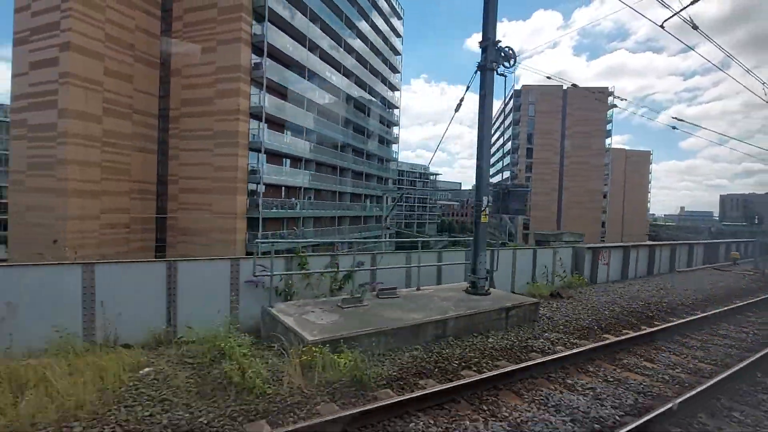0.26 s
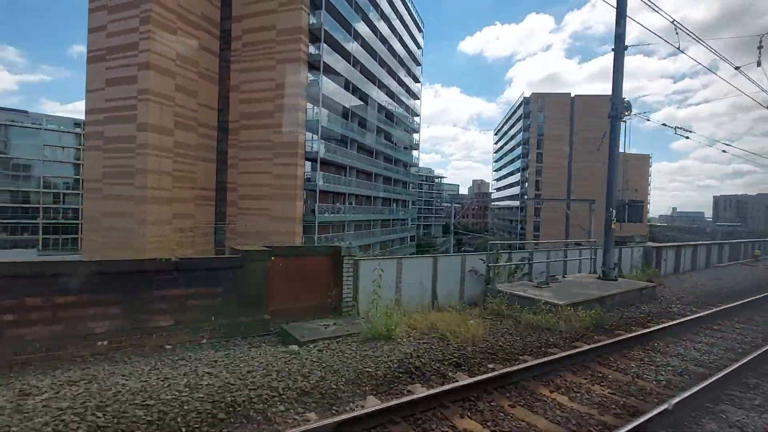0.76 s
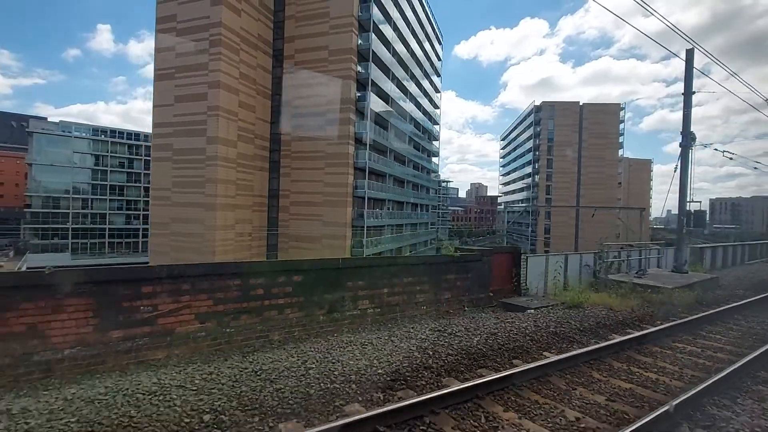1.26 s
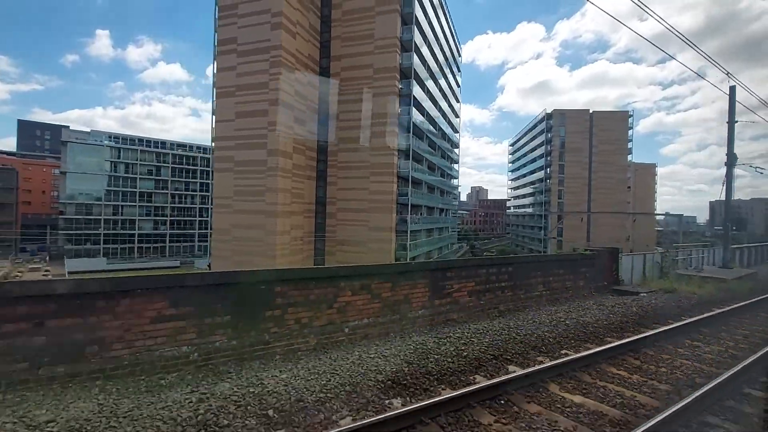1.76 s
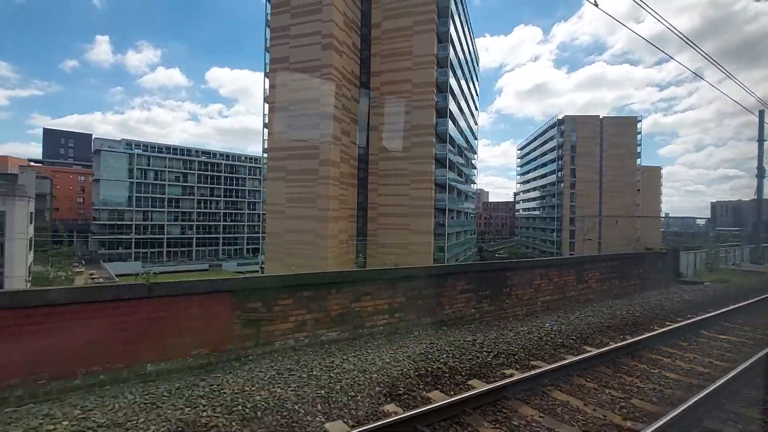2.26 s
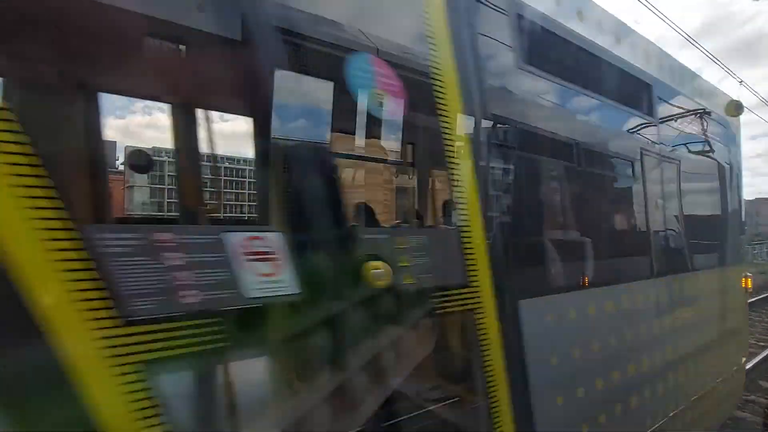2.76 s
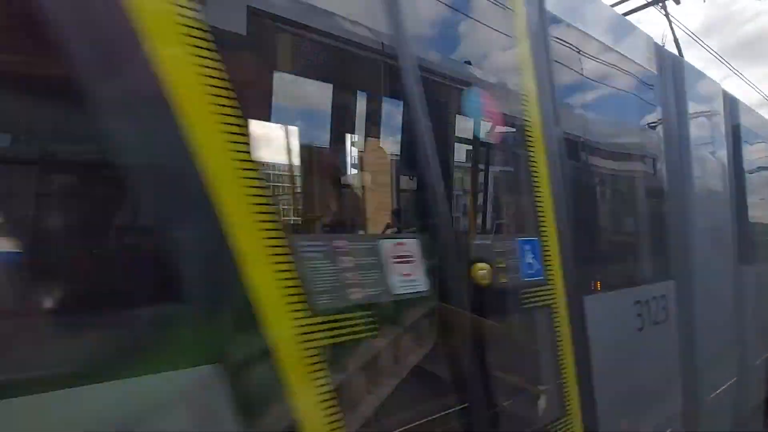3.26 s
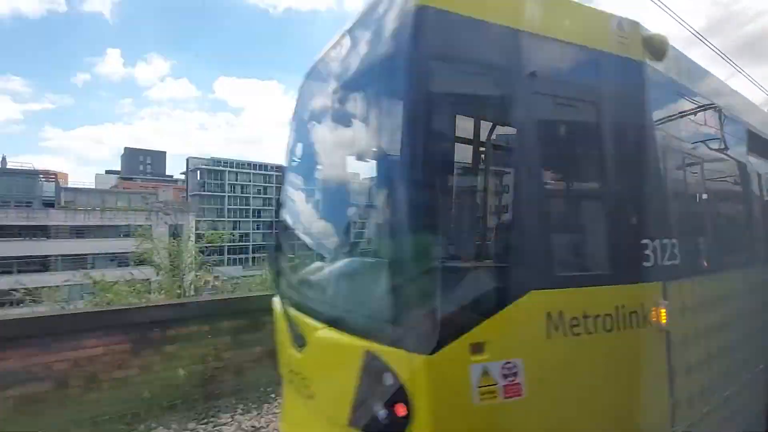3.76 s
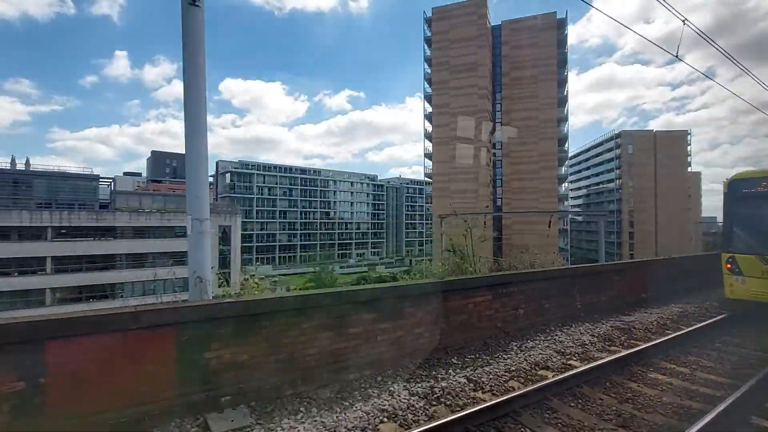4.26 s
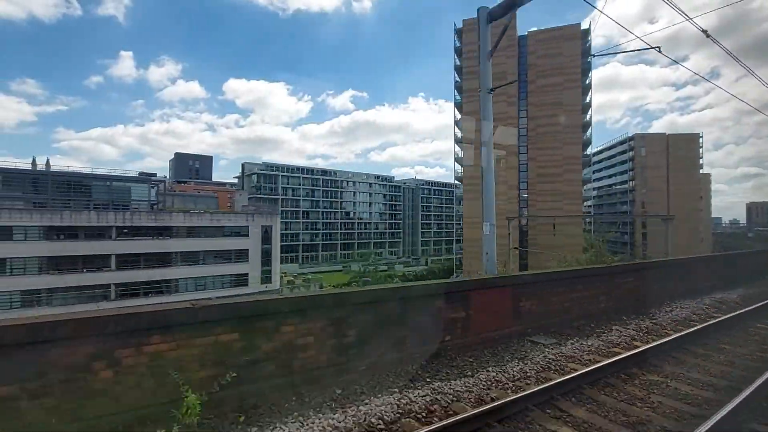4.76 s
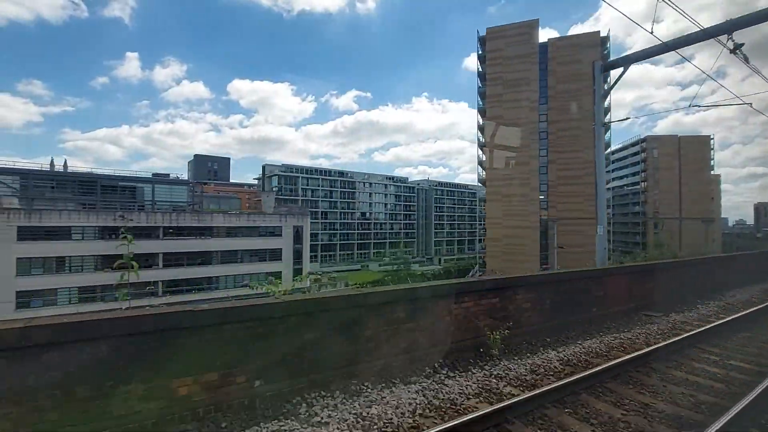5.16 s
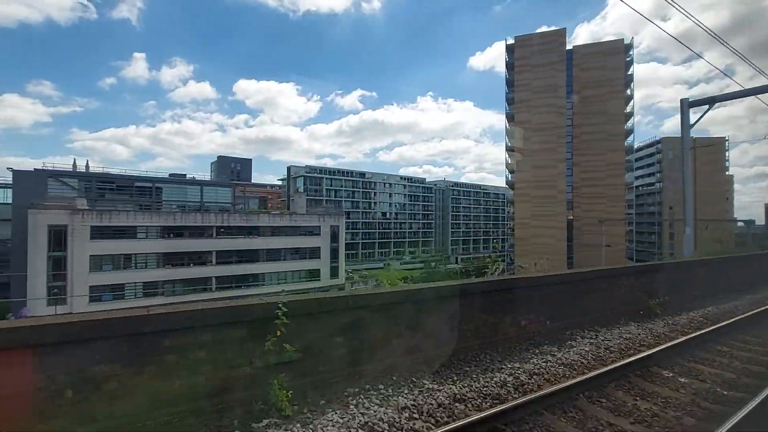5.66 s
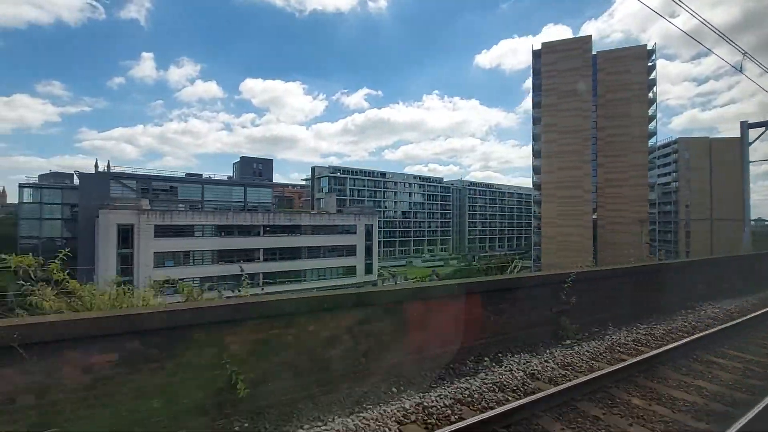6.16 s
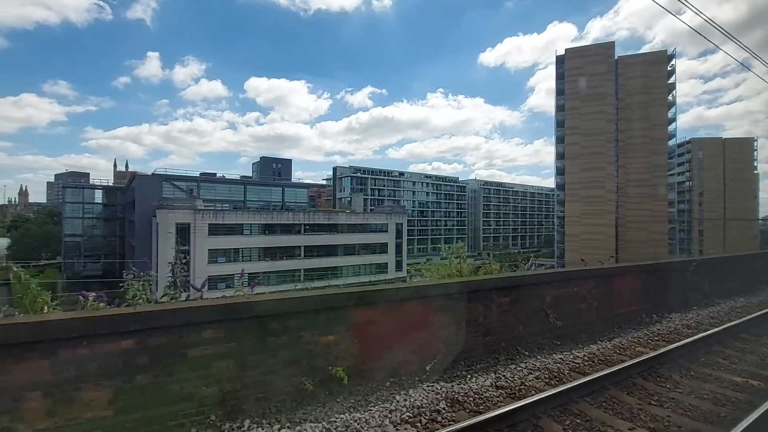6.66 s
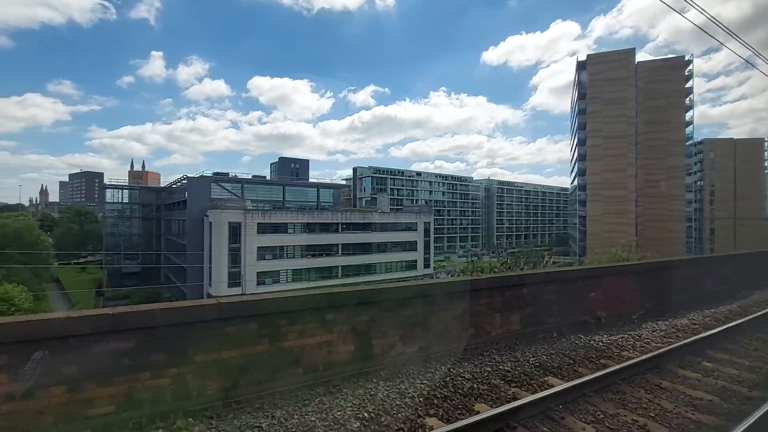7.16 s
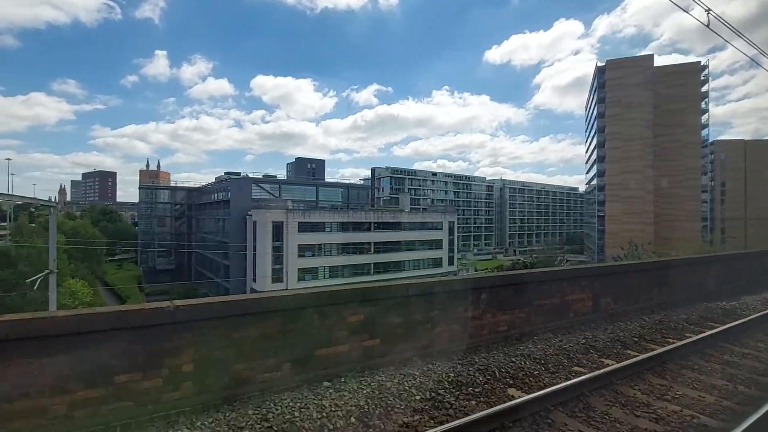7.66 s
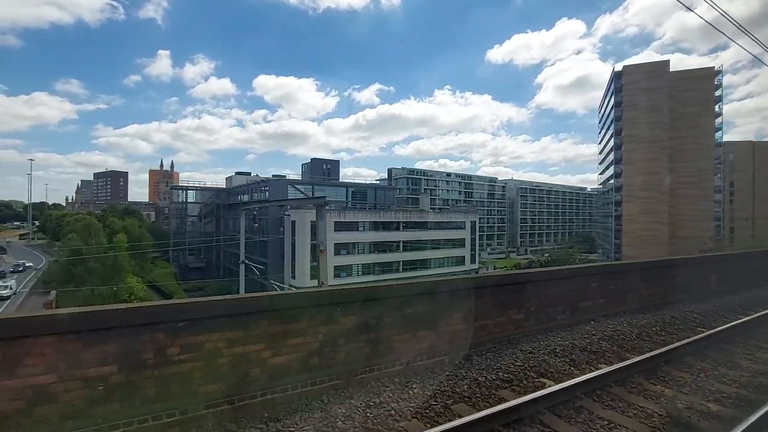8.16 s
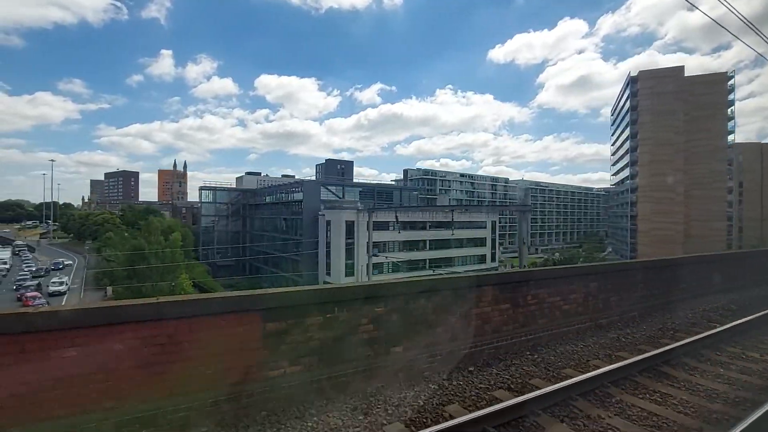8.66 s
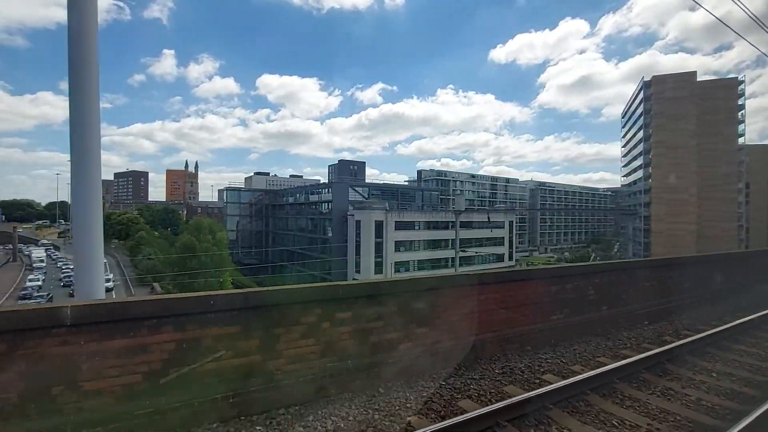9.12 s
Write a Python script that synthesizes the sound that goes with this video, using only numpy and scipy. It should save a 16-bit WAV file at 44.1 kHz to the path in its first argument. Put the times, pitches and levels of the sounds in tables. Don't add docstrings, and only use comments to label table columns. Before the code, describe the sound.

Window seat inside a moving tram: low rail rumble with a steady hum, an early dull panel knock, small trim ticks and short rubber squeaks. Around three seconds another tram rushes past with a swell of air and one hollow knock. Soon after, the track drums heavily as a bridge begins, with soft low thumps, while the hum fades. Close stereo cabin pickup, bass centred, highs wide.

```python
import sys
import numpy as np
from scipy import signal
from scipy.fft import rfft, irfft, next_fast_len
from scipy.io import wavfile
from scipy.ndimage import uniform_filter1d, map_coordinates

SR = 44100
rng = np.random.default_rng(int(sys.argv[2]) if len(sys.argv) > 2 else 0)


def convert_level_to_amplitude(level_db):
    exponent = np.asarray(level_db, float) / 20
    return 10 ** exponent


def digitize_waveform(pressure):
    field = np.atleast_2d(pressure).T
    bounded = np.clip(field, -1, 1)
    quanta = np.round(bounded * 32767).astype(np.int16)
    wavfile.write(sys.argv[1], SR, quanta)


N = 414082

# time_s, level_db
RAIL_ROUGHNESS = [(0, 1.5), (.5, 0.5), (1.4, -1), (2.5, -0.5), (3.4, 0.5), (4.2, -0.5), (4.8, 1),
                  (5.4, -0.5), (6.0, -1), (6.5, -1), (7.0, 1.5), (7.6, -1), (8.0, 0.2), (8.5, 0.5),
                  (8.9, -0.5), (9.15, -2), (9.39, -1)]
DECK_FROM_S, DECK_RAMP_S = 4.125, 0.48


def unit(x):
    return x / np.sqrt(np.mean(x ** 2) + 1e-20)


def along(points, hz):
    f, v = np.transpose(points)
    return np.interp(np.log(hz + 1), np.log(f + 1), v)


def curves(rows):
    s, *cols = np.transpose(rows)
    return [np.interp(np.arange(N) / SR, s, c) for c in cols]


def wobble(rate_hz, size=N):
    knots = rng.standard_normal(int(size * rate_hz / SR) + 4)
    return map_coordinates(knots, [np.arange(size) * rate_hz / SR])


def ramp(start_s, length_s):
    return np.sin(np.pi / 2 * np.clip((np.arange(N) / SR - start_s) / length_s, 0, 1)) ** 2


def bump(centre_s, half_s, edge=2):
    coarse_s = np.arange(0, N, 64) / SR
    return np.exp(-np.abs((coarse_s - centre_s) / half_s) ** edge).repeat(64)[:N]


def passing():
    return bump(3.08, 0.73, edge=2.8)


def settled():
    return ramp(DECK_FROM_S, 3.03)


def filtered(x, response):
    m = next_fast_len(N + 8192)
    return irfft(rfft(x, m) * response(np.fft.rfftfreq(m, 1 / SR)), m)[..., :N]


def spread(pair):
    # pitch_hz, left-right likeness [0..1]
    likeness = [(25, .978), (60, .993), (150, .994), (290, .93), (420, .8), (600, .78), (800, .55),
                (1300, 0), (15000, 0)]
    turn = lambda hz: np.arccos(np.clip(along(likeness, hz), -1, 1)) / 2
    mid, side = filtered(pair, lambda hz: np.array([np.cos(turn(hz)), np.sin(turn(hz))]))
    return np.array([mid + side, mid - side])


def steadied(x, window_s, share):
    power = np.abs(uniform_filter1d(x ** 2, max(int(window_s * SR), 1), axis=-1)) + 1e-4 * np.mean(x ** 2)
    return unit(x * power ** (-share / 2))


def rush(spectrum, patchy_db):
    z = signal.stft(rng.standard_normal((2, N)), nperseg=512)[2]
    field = uniform_filter1d(rng.standard_normal(z.shape[1:]), size=5, axis=0)
    field = uniform_filter1d(field, size=12, axis=1)
    pair = signal.istft(z * convert_level_to_amplitude(patchy_db * unit(field)), nperseg=512)[1][:, :N]
    return unit(filtered(pair, lambda hz: convert_level_to_amplitude(along(spectrum, hz))))


def narrow(hz, width_hz, size=N):
    phase = 2 * np.pi * np.cumsum(hz * np.ones(size)) / SR
    bands = [wobble(width_hz, size) * np.cos(phase) + wobble(width_hz, size) * np.sin(phase)
             for _ in range(2)]
    return unit(np.array(bands))


def cabin_levels():
    # time_s, level_db
    draught = [(0.0, -57.5), (1.67, -56), (2.46, -54.5), (3.11, -47), (3.71, -52), (4.0, -55), (4.6, -53),
               (4.84, -54.5), (5.6, -51), (5.75, -54), (7.14, -54.5), (7.43, -58), (7.66, -55.5),
               (7.87, -51.5), (8.29, -55), (8.66, -50), (9.05, -55), (9.39, -54.5)]
    # over_draught_db, share of draught swing, passing_db, settled_db
    layers = [(15, 0.13, 4.5, -0.5), (7.5, 0.03, 4.5, -3.5), (1.66, 1.24, -0.91, -0.64), (-11, 0.9, 3, -1.5)]
    leak_db, = curves(draught)
    mean_db = leak_db.mean()
    near, calm = passing(), settled()
    return [mean_db + db + share * (leak_db - mean_db) + pass_db * near + calm_db * calm
            for db, share, pass_db, calm_db in layers]


def cabin():
    # pitch_hz, density_db
    roar_spectrum = [(240, -14.5), (400, 2.5), (426, -5), (471, 1), (617, -3.5), (889, -3), (991, -10.5),
                     (1300, -17), (1690, -28.5), (2860, -120)]
    # pitch_hz, density_db
    ring_spectrum = [(900, -40), (1150, -7), (1330, -8.5), (1520, 0), (1620, 0), (1780, 0), (1980, -2.5),
                     (2200, -4.5), (2600, -11), (3300, -15), (3700, -12), (4100, -15.5), (4600, -42.5),
                     (7000, -120)]
    # pitch_hz, density_db
    hiss_spectrum = [(1500, -42.5), (2400, -4), (3200, -4.5), (4000, -6), (5600, -9.5), (6500, -7.5),
                     (8000, -16.5), (9100, -32.5), (11000, -62.5), (16000, -120)]
    # pitch_hz, density_db
    top_spectrum = [(5290, -50), (9000, -13.5), (9540, -7.5), (11100, -0.5), (11600, 0.5), (15100, -4.5),
                    (15700, -17)]
    roar_db, ring_db, hiss_db, top_db = cabin_levels()
    rough_db, = curves(RAIL_ROUGHNESS)
    jolt_db = 0.35 * wobble(8.7) + 1.0 * wobble(30)
    roar = convert_level_to_amplitude(roar_db + 0.29 * rough_db + 1.1 * jolt_db) * rush(roar_spectrum, patchy_db=0.74)
    ring = convert_level_to_amplitude(ring_db + 0.24 * rough_db + 0.8 * jolt_db) * rush(ring_spectrum, patchy_db=0.9)
    hiss = convert_level_to_amplitude(hiss_db + 0.33 * jolt_db) * rush(hiss_spectrum, patchy_db=1.5)
    top = convert_level_to_amplitude(top_db + 0.9 * jolt_db) * rush(top_spectrum, patchy_db=-2.0)
    return spread(roar + ring + hiss + top)


def drive():
    # time_s, level_db
    hum_level = [
        (0, -37),
        (.3, -36),
        (.6, -54),
        (1, -33.5),
        (3.6, -42),
        (4.0, -44),
        (4.4, -40),
        (5, -38),
        (6, -43),
        (9.39, -50.5),
    ]
    hum_phase = 2 * np.pi * np.cumsum(321 + 1.46 * wobble(4.8)) / SR
    hum = convert_level_to_amplitude(curves(hum_level)[0] + 1.8 * wobble(3.6)) * np.sin(hum_phase + np.array([[0.9], [-0.9]]))

    deck = ramp(DECK_FROM_S, DECK_RAMP_S)
    gear_db = -56.5 - 14 * (1 - ramp(-1.95, 3.4)) - 13 * deck
    inverter_db = -51.5 - 22 * (1 - ramp(8.0, 0.12))
    rail_db = -48 - 12 * (1 - deck)
    gear = convert_level_to_amplitude(gear_db) * narrow(1604, width_hz=11)
    inverter = convert_level_to_amplitude(inverter_db) * narrow(1044 + 6 * wobble(4), width_hz=35)
    motor_pull = convert_level_to_amplitude(-46) * bump(1.45, 1, edge=1.6) * narrow(904.5, width_hz=45)

    discs = convert_level_to_amplitude(gear_db + 3) * narrow(1965, width_hz=110) + convert_level_to_amplitude(gear_db - 5.5) * narrow(3660, width_hz=120)
    discs = discs * convert_level_to_amplitude(3 * passing() + 2.8 * wobble(13))
    rail = spread(convert_level_to_amplitude(rail_db) * narrow(469, width_hz=35))
    return hum + gear + inverter + motor_pull + discs + rail


def chirps():
    # start_s, length_s, from_hz, to_hz, width_hz, level_db
    light_slips = [(0.81, .09, 11100, 11150, 500, -58), (.81, .08, 15200, 14900, 700, -58),
                   (1.602, 0.13, 12000, 13300, 700, -53), (1.615, .13, 14900, 14600, 1800, -51),
                   (1.17, 0.11, 12300, 14000, 350, -46), (1.77, 0.11, 13500, 13400, 600, -52),
                   (3.05, 0.15, 6150, 6200, 600, -48), (2.95, 0.38, 3200, 3300, 2800, -50.5),
                   (4.96, .08, 11700, 11750, 300, -67), (7.07, .06, 10250, 10400, 350, -65),
                   (7.09, 0.13, 10650, 10950, 300, -58), (7.173, 0.098, 10850, 10900, 250, -70),
                   (8.565, 0.028, 14800, 14750, 300, -66)]
    out = np.zeros((2, N))
    for s, length_s, from_hz, to_hz, width_hz, db in light_slips:
        start, size = round(s * SR), round(length_s * SR)
        squeal = narrow(np.linspace(from_hz, to_hz, size), width_hz, size) * convert_level_to_amplitude(4.6 * wobble(83, size))
        out[:, start:start + size] += convert_level_to_amplitude(db) * signal.windows.tukey(size, 0.85) * squeal
    return out


def squeaks():
    # peak_s, hold_s, note_db, note_hz, rasp_db
    seal_slips = [(.3, .06, -72, 6330, -74), (0.829, 0.03, -53, 6760, -47.5),
                  (1.179, 0.044, -38.5, 6170, -41), (1.648, .055, -82, 6600, -51.5),
                  (1.785, 0.064, -54, 6670, -42), (2.826, 0.016, -68, 6170, -50.5),
                  (3.078, 0.023, -42.5, 6300, -46), (3.372, .03, -62, 6300, -55.5),
                  (3.797, 0.042, -55, 6440, -57.5), (4.78, 0.024, -63, 6560, -59),
                  (7.932, .03, -54, 6700, -63), (8.63, 0.046, -52.5, 6680, -60.5)]
    # pitch_hz, density_db
    rasp_spectrum = [(3290, -56), (5600, -22), (6240, -7), (6570, -10), (8570, -15.5), (9220, -19),
                     (10900, -4.5), (13100, -2.5), (15700, -8)]
    out, scrape, size = np.zeros((2, N)), rush(rasp_spectrum, patchy_db=4.0), SR // 3
    t = np.arange(size) / SR - 0.06
    for s, hold_s, note_db, note_hz, rasp_db in seal_slips:
        start = round((s + t[0]) * SR)
        after_s = np.clip(t - hold_s, 0, 1)
        climb_hz = 1400 * after_s

        clear_db = 0.65 * (note_db + 32) - 69 * after_s
        clear = convert_level_to_amplitude(clear_db) * narrow(note_hz - 60 + climb_hz, 200, size)
        broad = narrow(note_hz + 170 + climb_hz, 450, size) + 0.52 * narrow(note_hz + 650, 1100, size)
        note = clear + 0.5 * convert_level_to_amplitude(-10 * np.clip(t, 0, 1)) * broad

        rasp_hz = 2.01 * note_hz - 1500 * after_s
        rasp = 0.64 * narrow(rasp_hz, 1200, size) + 0.89 * scrape[:, start:start + size]

        rise_db = 1104 * np.clip(t, -1, 0)
        slip = convert_level_to_amplitude(1.4 * wobble(300, size) + 0.7 * wobble(60, size) + rise_db)
        slip = slip * signal.windows.tukey(size, 0.15)
        note_gain = convert_level_to_amplitude(note_db + 3.5 - 146 * after_s)
        rasp_gain = convert_level_to_amplitude(rasp_db + 3.0 - 221 * after_s)
        out[:, start:start + size] += slip * (note_gain * note + rasp_gain * rasp)
    return out


def interior(size):
    # pitch_hz, t60_s
    decay = [(500, 0.15), (3000, 0.28), (12000, 0.15)]
    hz, t, z = signal.stft(rng.standard_normal((2, size)), SR, nperseg=256)
    z = z * convert_level_to_amplitude(-60 * t / along(decay, hz)[:, None])
    tail = signal.istft(z, SR, nperseg=256)[1][:, :size]
    return tail / np.linalg.norm(tail[0])


def ticks():
    # start_s, peak_db, low_db, top_db, left_right_db
    snaps = [(0.0266, -49.5, 10, -9, 5), (2.2388, -46.5, 10, -7.5, 0), (2.3082, -50, -4, -7.5, 4),
             (2.3555, -49, 5.5, -7.5, -7), (3.078, -32.5, 0, -15, -2), (4.7608, -52, -9, -6.5, -1.5),
             (5.055, -43.5, 3.5, -17.5, -1.5), (0.6504, -41.5, 15, -12, -7), (0.75, -42.5, 12.5, -8, 9.5),
             (0.9687, -32.5, 7, -10.5, 2), (1.133, -52, 20, -3.5, 8.5), (1.509, -27.5, 5.5, -17, 0.5),
             (1.784, -35, 10, -10.5, 2), (1.8537, -33, 8, -5, -1), (2.4104, -28.5, 3, -11.5, 3.5),
             (3.2688, -28, 1.5, -11.5, -5.5), (3.492, -31, 4.5, -11, -1), (4.4806, -27.5, 4.5, -13, -3),
             (4.6157, -35.5, 9, -4, -3.5), (4.9513, -33, 5, -15, -3), (4.998, -37.5, 6, -14.5, -5),
             (5.5386, -37, 7, -14.5, 1), (6.0868, -35, 6.5, -12.5, -2.5), (6.4097, -36, 3.5, -11, 5.5),
             (6.4384, -40, -2.5, -9.5, 1.5), (7.1542, -29, 2, -16, 1), (7.2682, -37, 4, -12, -4),
             (8.9253, -30, 3, -13, 3.5), (9.257, -32.5, 6, -10.5, -2), (9.3145, -37, 6.5, -9, -5)]
    # (Hz, dB)
    panel = [(350, -44.5), (650, 3.0), (1000, 4.0), (1400, -9.0), (1900, -3.5), (2600, -16.5), (3500, -43.5)]
    trim = [(2000, -40.0), (2700, 4.5), (5000, -3.5), (6500, -0.5), (8300, -10), (9500, -17.5), (10500, -43.5)]
    shine = [(8800, -47.0), (10500, -2), (12000, 3.5), (15500, -7.0)]
    t = np.arange(SR // 4) / SR
    bands = np.zeros((3, 2, N + len(t)))
    for s, db, low_db, top_db, pan_db in snaps:
        rattle = 0.15 * convert_level_to_amplitude(-60 * np.clip(t - 0.005, 0, 1) / 0.022) * rng.standard_normal((2, len(t)))
        sound = (rattle + convert_level_to_amplitude(8.0) * interior(len(t))) * np.clip(t / 0.0024, 0, 1)
        sound = sound * convert_level_to_amplitude([[db + pan_db / 4], [db - pan_db / 4]])
        band_gain = convert_level_to_amplitude([low_db + 21.5, 11, top_db + 17.0])[:, None, None]
        start = round(s * SR)
        bands[..., start:start + len(t)] += band_gain * sound
    return sum(filtered(band, lambda hz: convert_level_to_amplitude(along(response, hz)))
               for band, response in zip(bands[..., :N], [panel, trim, shine]))


def knocks():
    # start_s, peak_db, pitch_hz, t60_s, left_right_db
    panel_bumps = [(.845, -11, 234, 0.023, -1), (.855, -16, 211, 0.061, 1), (2.613, -25, 510, 0.033, 0),
                   (3.1, -42, 1650, .05, 0), (3.118, -42, 1630, .05, -2), (3.339, -36, 546, .03, 0),
                   (6.078, -29, 503, 0.035, 1), (6.284, -26, 550, .03, 0), (3.22, -31, 483, 0.041, 9),
                   (4.461, -42, 870, .02, 2), (4.716, -26, 670, 0.016, -4), (4.872, -39.5, 1590, 0.065, -1),
                   (5.394, -30.5, 694, 0.019, -1), (5.99, -42.5, 1214, 0.068, 7),
                   (6.371, -44, 2470, 0.064, 5), (7.775, -33, 780, 0.036, -4),
                   (8.31, -29.5, 752, 0.078, -5), (8.455, -29, 722, .1, -3), (7.92, -31.5, 733, .06, -3),
                   (8.64, -34, 708, 0.072, -4)]
    passing_bump = (3.0536, -11.5, 520, 0.014, 1.5)
    overtones = [(1.55, -14.5), (2.4, -25)]
    out, t = np.zeros((2, N + SR)), np.arange(SR // 8) / SR
    for s, db, hz, t60_s, pan_db in panel_bumps + [passing_bump]:
        swell = np.clip(t / 0.0065, 0, 1) ** 0.78 * convert_level_to_amplitude(-60 * np.clip(t - 0.006, 0, 1) / t60_s)
        sound = np.sin(2 * np.pi * hz * t * (1 + 0.31 * t))
        if db > -20:
            for ratio, part_db in overtones:
                sound = sound + convert_level_to_amplitude(part_db) * np.sin(2 * np.pi * ratio * hz * t)
        if db < -20:
            sound = sound + 0.56 * narrow(hz, 0.46 * hz, len(t))
        start = round(s * SR)
        out[:, start:start + len(t)] += convert_level_to_amplitude([[db + pan_db / 2], [db - pan_db / 2]]) * swell * sound
    return out[:, :N]


def joints():
    # start_s, peak_db, pitch_hz
    thumps = [(1.0, -20, 118), (1.542, -12.5, 109), (1.668, -14.5, 91), (2.243, -11.5, 99.6),
              (3.032, -16, 91.5), (3.282, -11, 98), (3.834, -16, 110.5), (4.239, -12, 123),
              (4.329, -10.5, 147), (4.409, -16, 120), (4.454, -7.5, 131), (4.483, -8, 135),
              (4.612, -9.5, 124), (4.642, -5, 132), (4.701, -5, 116.5), (4.72, -7.5, 120), (4.806, -7, 120),
              (4.861, -8, 122), (4.89, -7, 126), (5.225, -6.5, 105.2), (5.575, -8, 133), (5.644, -6, 124.4),
              (5.762, -7.5, 146), (6.107, -8, 128), (6.222, -15, 126), (6.934, -14, 138.5),
              (7.086, -5, 134.4), (7.876, -7.5, 135), (7.956, -7.5, 119), (8.347, -5, 143.4),
              (8.46, -13.5, 172), (8.722, -4, 129), (8.783, -11.5, 126)]
    rise_s, t60_s = 0.011, 0.12
    out, t = np.zeros(N + SR), np.arange(SR // 5) / SR
    swell = np.sin(np.pi / 2 * np.clip(t / rise_s, 0, 1)) ** 2
    swell = swell * convert_level_to_amplitude(-60 * np.clip(t - rise_s, 0, 1) / t60_s)
    for s, db, hz in thumps:
        start = round(s * SR)
        out[start:start + len(t)] += convert_level_to_amplitude(db - 2.5) * swell * np.sin(2 * np.pi * hz * t)
    return out[:N]


def part_levels():
    # centre_s, damping_db, half_length_s
    piers = [
        (5.014, 8, 0.12),
        (5.878, 3, 0.051),
        (6.592, 1.5, 0.2),
        (7.484, 6, 0.21),
        (9.127, 3, 0.12),
    ]
    # centre_s, level_db,
    # pitch_hz, length_s
    patches = [(0.845, 3.5, 185.0, 0.12), (1.213, 3.5, 135.0, 0.21), (1.303, 14.5, 101.3, 0.21),
               (2.524, 9.5, 101.0, 0.19), (3.064, 8, 101.0, 0.16), (3.067, 2, 135.0, 0.27),
               (3.14, 6.5, 64.6, 0.27), (3.275, 10, 102, 0.06), (3.638, 7, 65.0, 0.16),
               (4.347, 2.5, 65.0, 0.14), (4.475, -4.5, 135.6, 0.35), (4.67, 2, 134, 0.11),
               (4.717, 11, 101.0, 0.32), (5.154, 4.5, 135.0, 0.092), (5.34, 5.5, 101.6, 0.22),
               (5.499, 3.5, 65.0, 0.24), (5.703, 6.5, 101.0, 0.08), (6.1, 6.5, 135.0, 0.1),
               (6.13, -0.5, 101.0, 0.06), (6.289, 6, 137, 0.13), (6.962, 2.5, 135.0, 0.11),
               (7.113, -4, 137, 0.18), (7.13, -1.5, 101.5, 0.19), (7.8, 4, 136, 0.11),
               (8.467, 6.5, 186, 0.097), (8.6, 4, 136, 0.044), (8.65, 1.5, 100, 0.16),
               (8.728, 4.5, 185.0, 0.05), (8.739, 3.5, 132, 0.061), (8.94, 2, 65.0, 0.12),
               (.1, 1, 180.6, 0.78),
        (.1, -15.5, 73, 0.72),
        (.1, -4.5, 282, 0.99),
        (1.766, 5.5, 98, 0.34),
        (3.656, 7.5, 284, 0.082),
        (4.403, 9, 141, 0.27),
        (5.156, 2, 279, 0.88),
    ]
    part_calm_db = [1, 3.5, -1.5, 2.5, -4.5]
    part_wake_db = [1.1, 0.98, 1.5, 0.8, 0.84]
    entry_lag_s = [0.25, 0.23, 0.01, -0.31, 0.35]
    # pitch_hz, ground_db, deck_rise_db, share of roughness, share of pier damping
    parts = [(64.5, -29, -5, -2.5, 0.1),
             (94, -29, 2, 1, 0.7),
             (133.5, -30.5, 12.5, 0.5, 1.1),
             (186, -31, 6, 1.08, -0.04),
             (308, -32, 6.5, 1.1, 0.14)]
    reach_octaves = 0.17
    rough_db, calm, near = curves(RAIL_ROUGHNESS)[0], settled(), passing()
    pier_db = sum(db * bump(s, half_s) for s, db, half_s in piers)
    lifts = [(db * bump(s, length_s / 2), hz) for s, db, hz, length_s in patches]
    levels = []
    for part, calm_db, wake_db, lag_s in zip(parts, part_calm_db, part_wake_db, entry_lag_s):
        part_hz, ground_db, deck_db, rough, pier = part
        level_db = ground_db + deck_db * ramp(DECK_FROM_S + lag_s, DECK_RAMP_S)
        level_db = level_db + calm_db * calm + wake_db * near + rough * rough_db - pier * pier_db
        for lift_db, hz in lifts:
            level_db = level_db + lift_db * np.exp(-(np.log2(hz / part_hz) / reach_octaves) ** 2)
        levels.append(level_db)
    return levels


def rolling():
    # pitch_hz, density_db
    thud_spectrum = [(12, -32), (25, -20.5), (40, -13.5), (52, -5), (62, 3.5), (75, 1), (88, -14),
                     (110, -46.5), (200, -120)]
    # pitch_hz, density_db
    boom_spectrum = [(120, -52.5), (150, -3.5), (172, 0.5), (192, -6), (212, -3.5), (240, -7.5),
                     (280, -53.5), (500, -120)]
    # pitch_hz, density_db
    wall_spectrum = [(150, -120), (215, -51), (250, -0.5), (270, 2.5), (298, -2.5), (325, 0.5), (360, -7),
                     (420, -15.5), (520, -56.5), (900, -120)]
    # time_s, pitch_hz
    drum_pitch = [
        (0, 135),
        (4.3, 135),
        (5.0, 124),
        (5.4, 126),
        (6.2, 135),
        (7.2, 146),
        (7.7, 128),
        (8.4, 134),
        (8.9, 126),
        (9.39, 135),
    ]
    thud_db, low_db, high_db, boom_db, wall_db = part_levels()
    thud = steadied(rush(thud_spectrum, patchy_db=1.0), window_s=0.11, share=0.54)
    low = steadied(narrow(101 + 4 * wobble(3), width_hz=26), window_s=0.16, share=0.78)
    high_hz = curves(drum_pitch)[0] + 4 * wobble(3)
    high = steadied(narrow(high_hz, width_hz=30), window_s=0.17, share=0.42)
    boom = steadied(rush(boom_spectrum, patchy_db=-1.0), window_s=0.15, share=0.2)
    walls = steadied(rush(wall_spectrum, patchy_db=2.0), window_s=0.17, share=0.63)
    drums = convert_level_to_amplitude(low_db - 1.5) * low + convert_level_to_amplitude(high_db - 1.5) * high
    shell = convert_level_to_amplitude(boom_db - 0.47) * boom + convert_level_to_amplitude(wall_db - 0.17) * walls
    return spread(convert_level_to_amplitude(thud_db - 2.5) * thud + drums + shell)


def scene():
    return cabin() + drive() + chirps() + squeaks() + ticks() + knocks() + joints() + rolling()


def band_limit(x):
    return signal.sosfilt(signal.butter(12, 15860, fs=SR, output="sos"), x)


def record(dry):
    # pitch_hz, left_right_db
    port_colour = [(60, -0.5), (200, 0.5), (380, 1), (600, -1), (1200, 9.5), (2400, 4.5), (4400, -1.5),
                   (7000, 3.5), (8400, -14.5), (9300, 1), (10300, 5.5), (12000, 11), (15000, -3.5)]
    band_limit_hz = 15860
    sides = np.array([[1], [-1]])
    ports = filtered(dry, lambda hz: (hz < band_limit_hz) * convert_level_to_amplitude(along(port_colour, hz) / 2 * sides + 1.0))
    return band_limit(ports)


dry = scene()
out = record(dry)
digitize_waveform(out)
```